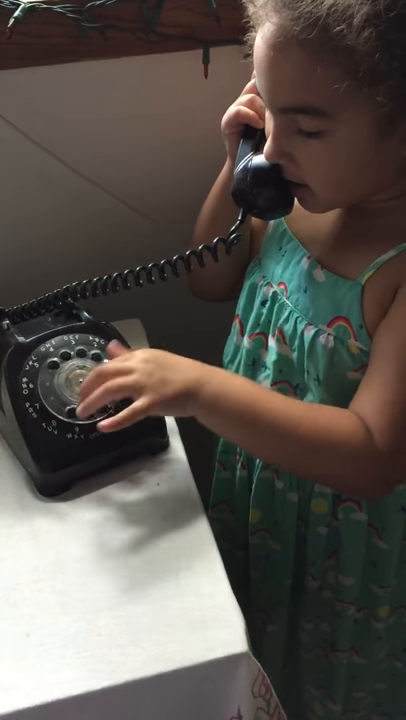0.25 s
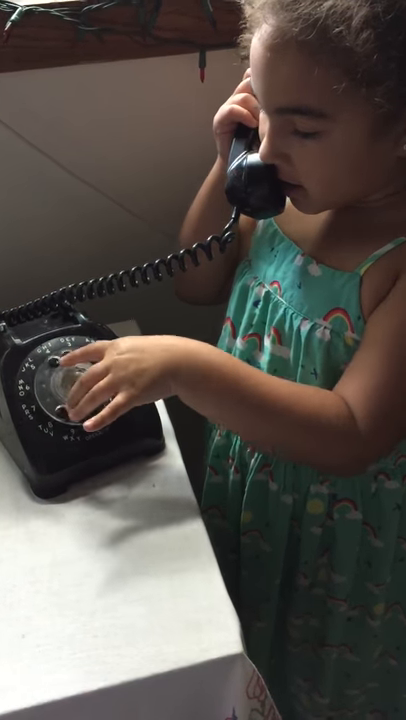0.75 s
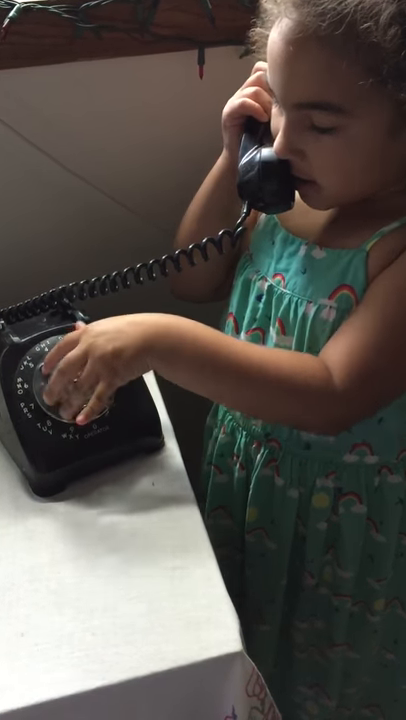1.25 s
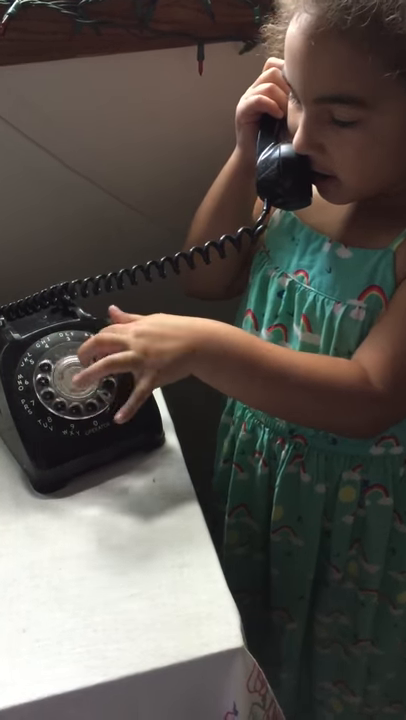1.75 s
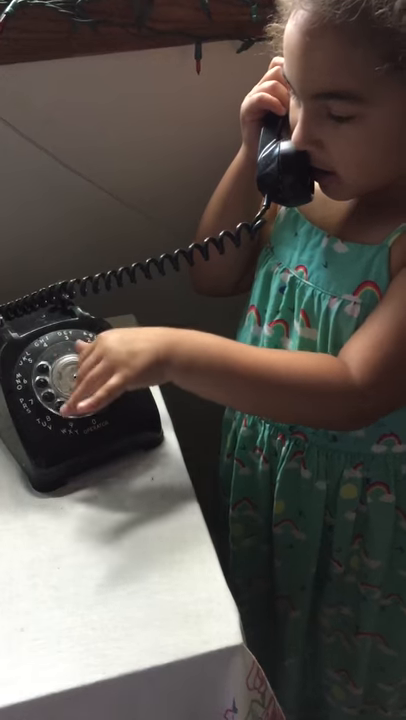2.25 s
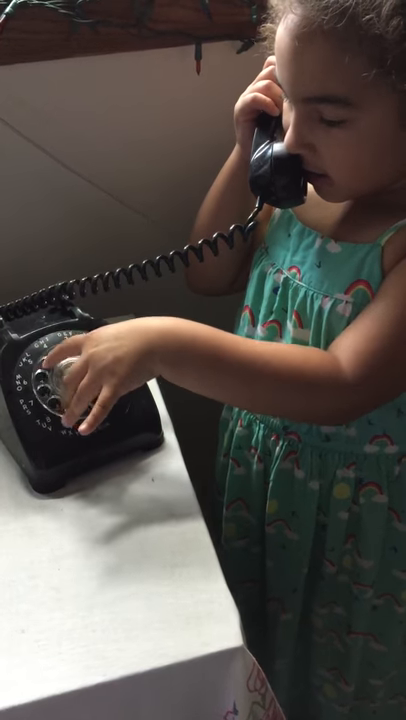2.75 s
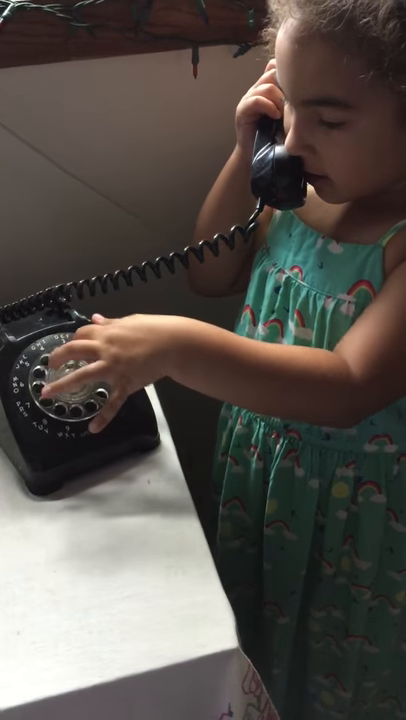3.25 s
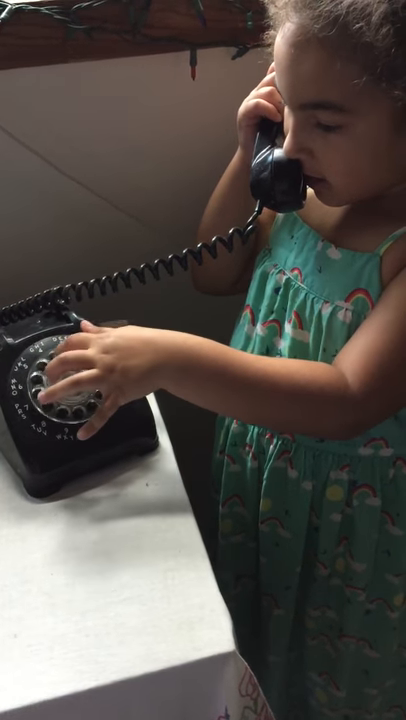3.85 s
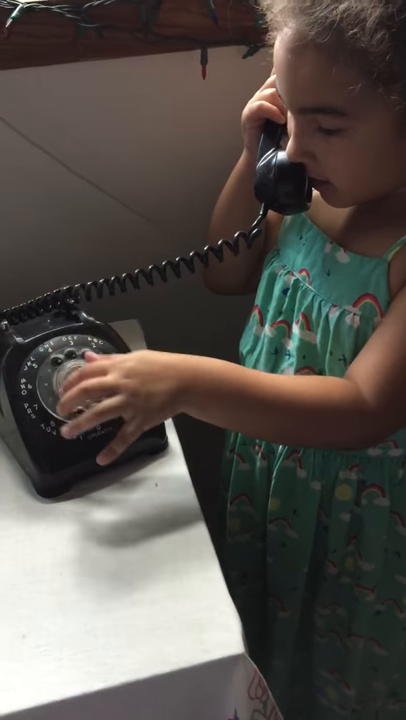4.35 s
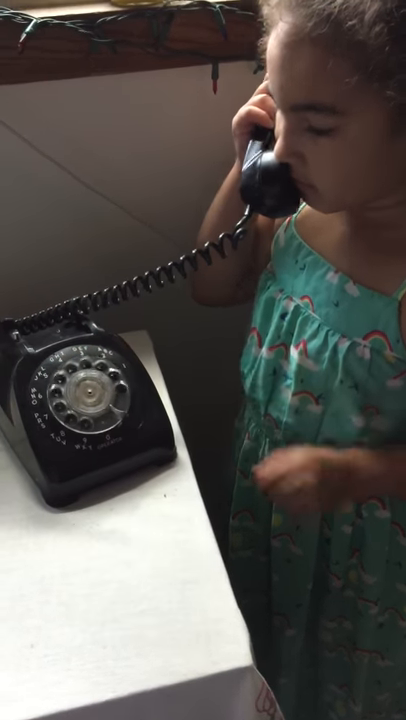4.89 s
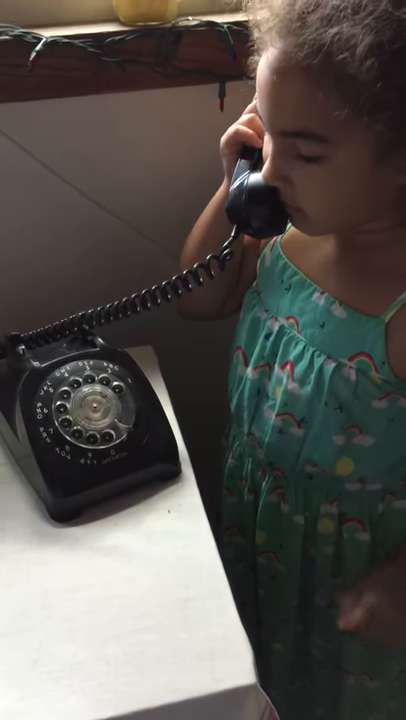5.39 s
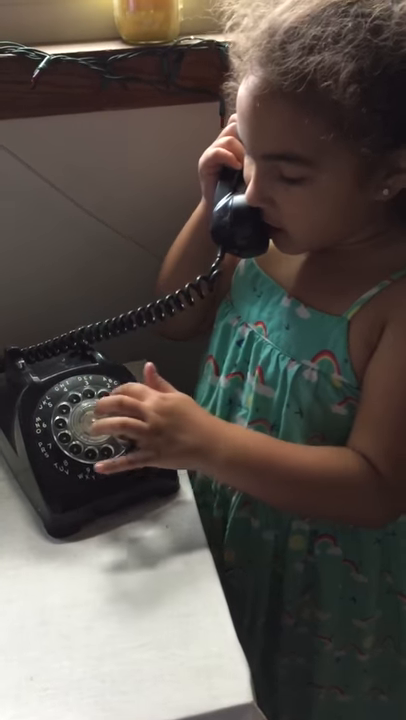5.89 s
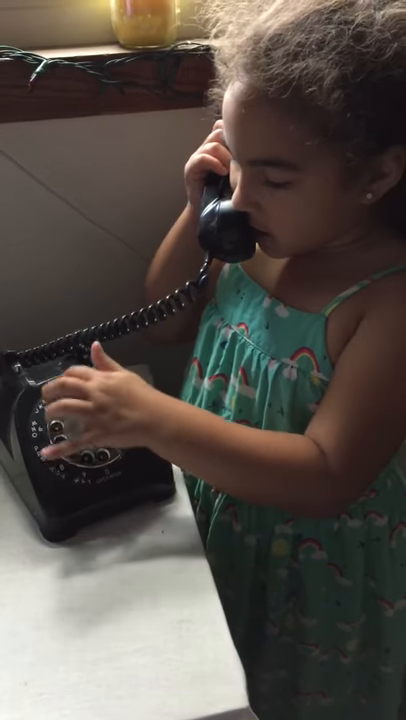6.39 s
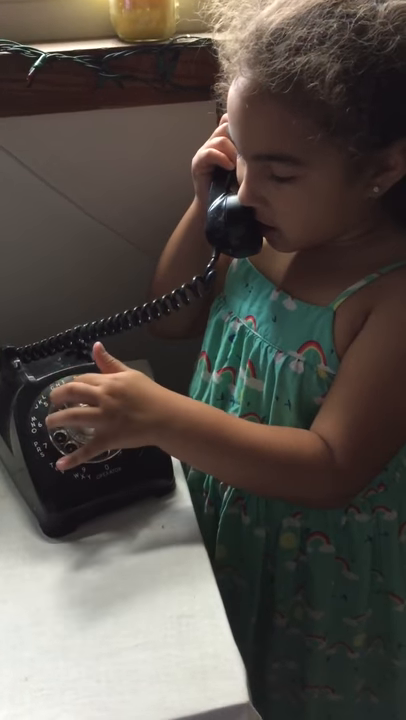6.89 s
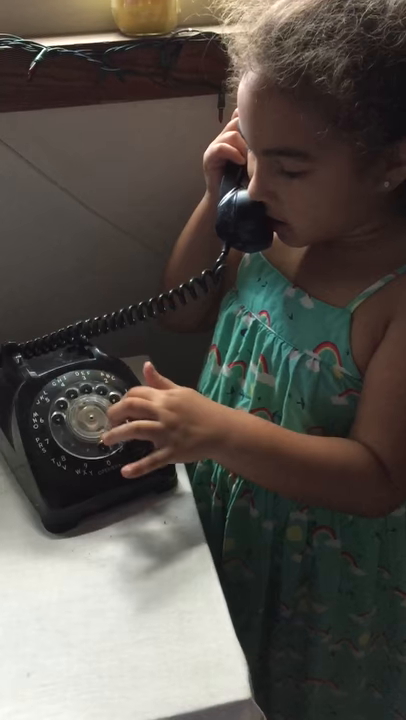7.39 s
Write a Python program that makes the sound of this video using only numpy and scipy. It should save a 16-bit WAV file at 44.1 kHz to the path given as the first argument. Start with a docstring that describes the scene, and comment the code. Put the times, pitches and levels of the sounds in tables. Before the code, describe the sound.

A rotary telephone dial is handled close to a mono microphone in a small quiet room, over faint steady air noise, a lumpy low drone and the soft stir of an arm. At 0.4 to 0.5 s a fingertip bump and crisp double click; faint taps and ticks follow to 1.6 s. At 2.25 s comes the loudest hard, bright clack, trailed by smaller clicks until about 2.5 s. Near quiet until a hollow, dull knock at 3.4 s with a tiny brief squeak. Clicks at 3.93 and 3.96 s lead into the release: from 4.03 to 5.18 s the wheel runs back with a rasping, gritty gear whirr, recurring scrapes and uneven surges over a low buzz near 120 Hz, sagging slightly in pitch. It stops abruptly with a bright clack and short room tail. Then quiet, with barely audible touches at 5.9, 6.6 and 7.2 s.

```python
"""A rotary telephone under a child's hands, close to a mono microphone in a small quiet room.
Fingertips bump the finger wheel and hard clicks ring the case: shaped bursts of noise that die away.
Let go once, the wheel runs back with a rasping whirr, gear-tooth impacts through resonances, over
the governor's hum, a stack of sines, and clacks against its rest. A fingertip squeaks briefly.
Behind it lie the noise of the air, a low drone and the soft stir of an arm."""
import sys
import numpy as np
from scipy import signal
from scipy.fft import rfft, irfft
from scipy.io import wavfile
from scipy.ndimage import uniform_filter1d

SR = 44100
rng = np.random.default_rng(int(sys.argv[2]) if len(sys.argv) > 2 else 0)


def transcribe(u):
    """Save the signal u as a 16-bit wav file named by the first command-line argument.

    u: samples, shape (n,) or (channels, n), limited to [-1, 1]; the rate is SR.
    q: integer samples, one column per channel.
    """
    v = np.clip(np.atleast_2d(u).T, -1, 1)
    q = np.round(v * 32767).astype(np.int16)
    wavfile.write(sys.argv[1], SR, q)


N = 336483

RELEASE_S, REST_S = 4.03, 5.176  # the wheel runs free between these times


def amp(db):
    """Decibels to gain."""
    return 10 ** (np.asarray(db) / 20)


def evened(x):
    """Scales to rms 1."""
    return x / np.sqrt(np.mean(x ** 2) + 1e-20)


def read(points, hz):
    """Reads a table on a log-frequency axis."""
    f, value = np.transpose(points)
    return np.interp(np.log(hz + 1), np.log(f + 1), value)


def add(mix, s, sound):
    """Mixes a sound in at time s."""
    part = mix[round(s * SR):][:len(sound)]
    part += sound[:len(part)]


def bins(size):
    """Frequencies of a spectrum."""
    return np.fft.rfftfreq(size, 1 / SR)


def peaks(modes, hz, boost_db):
    """Gain of resonances standing above a flat response."""
    power = 1
    for f, width, db in modes:
        power = power + amp(db + boost_db) ** 2 / (1 + (2 * (hz - f) / width) ** 2)
    return np.sqrt(power)


def lift(hz, centre_hz, db, sharpness=7):
    """Gain of one broad resonance."""
    return 1 + (amp(db) - 1) / (1 + (sharpness * (hz - centre_hz) * 2 / centre_hz) ** 2)


def causal(gain):
    """Impulse response of minimum phase for a gain curve."""
    log_gain = np.log(np.maximum(gain, 1e-5))
    circle = np.concatenate([log_gain, log_gain[-2:0:-1]])
    return irfft(np.exp(np.conj(signal.hilbert(circle)))[:len(gain)])


def wander(rate_hz):
    """Slow chance of rms 1."""
    return evened(irfft(rfft(rng.standard_normal(N)) * np.exp(-(bins(N) / rate_hz) ** 2), N))


def dying_noise(t60, size, stretch=1, rise_cycles=0, count=16):
    """A flat burst of energy 1; each band swells over a few of its cycles and dies at its own speed."""
    t, hz, centres = np.arange(size) / SR, bins(size), np.geomspace(150, 16000, count)
    white, out = rfft(rng.standard_normal(size)), np.zeros(size)
    for centre, pick in zip(centres, np.eye(count)):
        share = read(np.c_[centres, pick], hz)
        swell = 1 - np.exp(-t * centre / (abs(rise_cycles) + 1e-6))
        decay = np.exp(-np.log(1000) * t / (read(t60, centre) * stretch))
        band = irfft(white * share, size) * swell * decay
        out += evened(band) * np.sqrt(share.mean())
    return evened(out) / np.sqrt(size)


def air():
    """Steady room noise and a lumpy drone, with the soft, uneven stir of a moving arm."""
    # Colour of the room noise. Each row: frequency in Hz, relative level in dB
    air_colour = [(25, -32.5), (40, -16.5), (55, -6.5), (72, -11), (150, -6), (260, -11), (600, -14),
                  (800, -16), (2200, -17), (3200, -27.5), (5000, -32), (9000, -37), (10500, -39.5),
                  (16000, -42.5)]
    # Low drone of the room. Each row: centre in Hz, half-width in Hz, level in dB before it wavers
    rumble = [(58, 8, -69.5), (93, 7, -61.5), (119, 6, -66)]
    # Hand and arm shifting softly. Each row: time in seconds, level in dB before stir_gain_db
    handling = [(0, -63), (1.5, -63), (3.6, -65.5), (7.6, -66)]
    stir_colour = [(90, -28.0), (220, 2), (480, 0.5), (900, -15), (3000, -33.5)]  # Hz, relative dB
    air_db, stir_gain_db = -61, -3
    stir_wander_db, lumpy_db = 3.5, 3.0  # rms of the slow level changes
    hz = bins(N)

    def noise(gain):
        """Steady noise of rms 1 with a given colour."""
        return evened(irfft(rfft(rng.standard_normal(N)) * gain, N))

    drone = np.zeros(N)
    for f, half_width, db in rumble:
        drone += amp(db + lumpy_db * wander(7.2)) * noise(1 / (1 + ((hz - f) / half_width) ** 2))
    motion_db = np.interp(np.arange(N) / SR, *np.transpose(handling)) + stir_wander_db * wander(18)
    stir = amp(motion_db + stir_gain_db) * noise(amp(read(stir_colour, hz)))
    return amp(air_db) * noise(amp(read(air_colour, hz))) + drone + stir


def room(x, onset_s=.012, size=32768):
    """A few near reflections and the short tail of a small room."""
    # Decay of the tail. Each row: frequency in Hz, time to fall 60 dB in seconds
    tail_t60 = [(150, 0.33), (500, 0.4), (2000, 0.39), (4500, 0.37), (9000, 0.34), (15000, .3)]
    # Strength of the tail. Each row: frequency in Hz, level in dB
    tail_level = [(150, -7.5), (500, -10), (2000, -10), (4500, -17), (9000, -16.5), (11500, -18.5),
                  (16000, -21)]
    # Reflections off table and walls. Each row: delay in seconds, level in dB
    echoes = [(.0095, -20.5), (.017, -20), (.03, -19.5), (.041, -23.5)]
    onset = 1 - np.exp(-(np.arange(size) / SR / onset_s) ** 2)
    tail = dying_noise(tail_t60, size) * onset
    response = signal.fftconvolve(tail, causal(amp(read(tail_level, bins(1024)))))
    for delay, db in echoes:
        add(response, delay, amp(db) * np.array([.25, .5, .25]))  # slightly dulled
    return x + signal.fftconvolve(x, response)[:N]


def squeak():
    """A fingertip slips on the wheel: a short, unsteady stick-slip tone."""
    # The slip: start in seconds, end in seconds, mean pitch in Hz
    start, end, hz = (3.445, 3.495, 1809)
    squeak_db = -62
    out, swell = np.zeros(N), np.hanning(round((end - start) * SR))
    turns = np.cumsum(hz * (1 + .015 * wander(200)[:len(swell)])) / SR
    add(out, start, amp(squeak_db) * 2 * swell * np.sin(2 * np.pi * turns))
    return out


def rub_db(t):
    """How far the rub of the gears lies above its average."""
    # How hard the gear train rubs as it runs back; only departures from the mean count.
    # Each row: time in seconds, rub in dB
    run = [(4.04, -44.5), (4.052, -43.5), (4.414, -39.5), (4.448, -45.5), (4.56, -40), (4.582, -45.5),
           (4.616, -38), (4.632, -45), (5.16, -47)]
    s, db = np.transpose(run)
    return np.interp(t, s, db - db.mean())


def governor_speed():
    """Turns per second, and full speed: a quick spin-up, then a sag as the spring unwinds, until rest."""
    full_hz, sag_hz_per_s, spin_up_s = 120.4, 5, .025
    age = np.maximum(np.arange(N) / SR - RELEASE_S, 0)
    speed_hz = (full_hz - sag_hz_per_s * age) * (1 - np.exp(-age / spin_up_s))
    return speed_hz * (np.arange(N) / SR < REST_S), full_hz


def governor_turns():
    """Turns made by the governor, whose speed wavers a little."""
    speed_hz, _ = governor_speed()
    return np.cumsum(speed_hz * (1 + 0.014 * wander(26))) / SR


def hum(turns):
    """The slightly unbalanced governor shakes the case at multiples of its speed."""
    # Each row: multiple of the turning speed, relative level in dB before it wavers
    harmonics = [(1, -1), (2, -1.5), (3, -3), (4, -2), (5, -4.5)]
    hum_db = -63  # at average rub and full speed
    speed_hz, full_hz = governor_speed()
    level = amp(hum_db + rub_db(np.arange(N) / SR)) * (speed_hz / full_hz) ** 2
    tones = np.zeros(N)
    for multiple, db in harmonics:
        tone = np.sin(2 * np.pi * (round(multiple) * turns + rng.random()))
        tones += amp(db + 2.4 * wander(18)) * tone
    return level * np.sqrt(2) * tones


def teeth(turns, per_s=1700, spread_db=1.0, rub=0.71, throb=0.054):
    """Tiny impacts of gear teeth over a steady rub, pressed harder once a governor turn."""
    strength = amp(spread_db * np.minimum(rng.exponential(1, N), 4))
    ticks = (rng.random(N) < per_s / SR) * rng.choice([-1, 1], N) * strength
    grain = evened(ticks) + rub * rng.standard_normal(N)
    return evened(grain * (1 + throb * np.cos(2 * np.pi * turns)))


def shifting(x, patchy_db=2.0):
    """As the points of contact move, patches of the spectrum swell and fade."""
    z = signal.stft(x, nperseg=512, noverlap=384)[2]
    patches = uniform_filter1d(rng.standard_normal(z.shape), size=9, axis=0)
    patches = uniform_filter1d(patches, size=12, axis=1)
    return signal.istft(z * amp(patchy_db * evened(patches)), nperseg=512, noverlap=384)[1][:N]


def scrapes(turns, frame, hz, size=4096):
    """Brief drags on the gear train: the same tight spots return every turn, each with its own colour."""
    # Each row: place in the turn from 0 to 1, level in dB before gain_db,
    # resonance in Hz, treble in dB
    tight_spots = [(.22, -34.5, 4320, 5), (.38, -35, 2750, 2.5), (.745, -35.5, 2450, -5),
                   (.98, -33, 2440, 4)]
    gear_turn_s = .26  # one turn of the gear that carries the pulse cam
    rise_s, gain_db, follow = 0.0046, -7, 0.95  # follow in dB per dB of rub
    lift_db, top_db = 6, 4  # top: above 10 kHz, relative to the treble
    out, grain, age = np.zeros(N), teeth(turns), np.arange(size) / SR / rise_s
    for place, db, centre_hz, treble_db in tight_spots:
        slope = [(500, -8.0), (3000, -6), (10000, treble_db), (14000, treble_db + top_db)]
        tone = amp(read(slope, hz)) * lift(hz, centre_hz, lift_db)
        colour = causal(evened(frame * tone))
        for s in np.arange(RELEASE_S + place * gear_turn_s, REST_S - 2 * rise_s, gear_turn_s):
            drag = grain[round(s * SR):][:size] * age * np.exp(1 - age)
            level = amp(db + gain_db + follow * rub_db(s))
            add(out, s, level * signal.fftconvolve(drag, colour))
    return out


def whirr(turns, size=4096):
    """The spring drives the gears; they chatter, ring a plate and shake the case; the governor hisses."""
    # Colour of the gears. Each row: frequency in Hz, relative level in dB
    gear_colour = [(150, -11), (240, -18), (285, -17), (360, 1.5), (570, 0.5), (760, -3.5), (1000, -8),
                   (1230, 4), (1400, 0.5), (2200, 1.5), (4400, 1.5), (4780, -8), (5250, 1.5), (7200, -8.5),
                   (11300, -8.5), (12400, -15.5), (16000, -23)]
    # Resonances of the gear frame. Each row: centre in Hz, width in Hz, height in dB before a 6 dB boost
    frame_modes = [(1902, 80, 3), (2400, 38, -4), (2760, 29, 1.5), (3010, 110, -2), (4330, 48, 2.5),
                   (5080, 220, -2.5), (5450, 34, -11), (5830, 68, 1), (7500, 90, -4), (8260, 240, -5.5),
                   (9570, 150, 0), (9840, 180, -1), (10400, 47, -2), (10970, 150, -1.5)]
    chatter_db, plate_db, hiss_db, shake_db = -44.5, -53, -50, -65.5  # at average rub
    plate_follow, hiss_follow = 0.19, 1.34  # dB per dB of rub
    creep_db, split_hz = -60, 7200  # chatter lies below the split, hiss above
    plate_hz, plate_width_hz, shake_hz, shake_width_hz = 2650, 520, 300, 260
    t, hz = np.arange(N) / SR, bins(size)
    frame = amp(read(gear_colour, hz)) * peaks(frame_modes, hz, boost_db=6)
    low = 1 / (1 + (hz / split_hz) ** 8)
    plate = 1 / (1 + (2 * (hz - plate_hz) / plate_width_hz) ** 2)
    shake = 1 / (1 + (2 * (hz - shake_hz) / shake_width_hz) ** 4)
    # the wheel first creeps under the lifting finger, then runs free
    creep = amp(creep_db) * ((t > 3.96) & (t < RELEASE_S))
    running = np.clip((t - RELEASE_S) / 0.0052, 0, 1) * (t < REST_S) * amp(1.2 * wander(67))

    def force(db, follow=1):
        """Drive of one layer, following the rub of the gears."""
        return running * amp(db + follow * rub_db(t))

    def ring(drive, gain):
        """Gear teeth at a given drive, heard through a resonant body."""
        return signal.oaconvolve(teeth(turns) * drive, causal(evened(gain)))[:N]

    out = ring(creep + force(chatter_db), frame * np.sqrt(low))
    out += ring(force(plate_db, plate_follow), frame * plate)
    out += ring(force(hiss_db, hiss_follow), frame * np.sqrt(1 - low))
    out += ring(force(shake_db), shake)
    return shifting(out) + scrapes(turns, frame, hz)


def blow(tone_db, ring, thud_hz, centre_hz, lift_db, size=8192):
    """One blow on wheel and case: a dying burst of noise with its own colour and length."""
    # Where thud, knock, level and treble act, in Hz
    tone_hz = [430, 1150, 3500, 12000]
    # Colour of the struck wheel and case. Each row: frequency in Hz, relative level in dB
    clack_colour = [(60, -45), (130, -17.5), (240, -11), (330, -13), (490, -11), (780, -15), (1000, -14.5),
                    (1300, -7.5), (1800, -8.5), (3000, -1.5), (4200, -1.5), (6300, -7), (8800, -6.5),
                    (11200, -15.5), (16000, -18)]
    # Decay before the ring factor. Each row: frequency in Hz, time to fall 60 dB in seconds
    clack_t60 = [(200, 0.043), (500, 0.047), (1200, 0.059), (3500, 0.041), (8000, 0.029), (15000, .018)]
    # Resonances of the case. Each row: centre in Hz, width in Hz, height in dB before a 5 dB boost
    case_modes = [(246, 19, -1), (1670, 127, -4), (1890, 90, -1), (2270, 130, -5.5), (2710, 41, -5.5),
                  (3360, 90, -5.5), (3710, 72, -2), (4000, 90, -5), (4393, 110, -4.5), (5460, 90, -6.5),
                  (5560, 200, -9)]
    blow_samples = .011 * SR  # nominal length that sets the level
    hz = bins(size)
    body = evened(amp(read(clack_colour, hz)) * peaks(case_modes, hz, boost_db=5))
    tone = amp(read(np.c_[tone_hz, tone_db], hz)) * lift(hz, centre_hz, lift_db)
    tone *= lift(hz, thud_hz, 12, sharpness=3.31)  # the whole telephone rocks on the table
    burst = dying_noise(clack_t60, size, max(ring, .2), rise_cycles=2.2, count=24)
    return np.sqrt(blow_samples) * signal.fftconvolve(burst, causal(body * tone))


def bumps():
    """Soft fingertips on the wheel: flesh passes little treble, and the case knocks hollow."""
    # Each row: time in seconds, thud in dB, knock in dB relative to the thud, thud in Hz, knock in Hz
    touches = [(.401, -35, -27, 520, 1300), (.739, -42, -12, 460, 1300), (.936, -43, -14, 415, 1300),
               (1.177, -39, -28, 432, 1300), (1.464, -38.5, -0.5, 484, 1320), (3.386, -21, -2, 530, 1073),
               (5.94, -39, -28.5, 250, 1300), (6.609, -40.5, -25, 480, 1300)]
    out, average_db = np.zeros(N), np.mean(touches, axis=0)[1]
    for s, db, knock_db, thud_hz, knock_hz in touches:
        above_db = db - average_db
        top_db = -34.5 + .25 * knock_db + 0.68 * above_db  # a stronger bump is brighter
        ring = 0.67 + 0.02 * knock_db  # less knock, shorter ring
        lift_db = 13 - 0.16 * above_db  # the hollow resonance stands out more under a light bump
        tone_db = [0, knock_db, top_db, top_db - 1]  # flesh damps the highest treble further
        add(out, s, amp(db) * blow(tone_db, ring, thud_hz, knock_hz, lift_db))
    return out


def clicks():
    """Hard, bright clicks: the wheel strikes its stop, bearing and rest, and the case rings."""
    # Where a blow lands sets its thud and the resonance that stands out.
    # Each row: time in seconds, level in dB, thud in dB, treble in dB, ring length factor,
    # thud in Hz, resonance in Hz, lift of that resonance in dB
    strikes = [(0.4467, -34, 7.5, 2.5, .8, 460, 6150, 6.5), (.450, -33, 8, -16, 0.92, 442, 1580, 9),
               (.487, -48, -9, -1, 1.5, 450, 2800, 4), (.497, -46.5, 13, 1.5, 0.88, 440, 8400, 11),
               (.724, -59, 0, -10, 2.6, 480, 4000, 2), (.903, -51, 8, 12, .62, 467, 3430, 7),
               (1.583, -62.5, 12, 14.5, 1.1, 480, 4040, 10.5), (2.233, -51.5, 16, 8, 1.3, 497, 6040, 10),
               (2.246, -17, 1, 4.5, 0.99, 563, 1820, 3), (2.326, -41, -9, -1, 1.3, 500, 8500, 6.5),
               (2.341, -42, -6, -3, 1.2, 500, 2960, 6), (2.362, -50, -6, 5, 0.64, 500, 8500, 3),
               (2.368, -42, 6.5, 7.5, 0.54, 450, 9000, 8.5), (2.408, -42.5, -3, -0.5, 0.99, 450, 3300, 6),
               (2.461, -54, 8, 7, 1.1, 485, 2740, 8.5), (2.537, -75, -0.5, 21, 4.3, 479, 3480, 16),
               (3.934, -41.5, -1, -1.5, 1.1, 484, 2180, 2), (3.958, -36.5, 0.5, -5, 0.93, 420, 3370, 5.5),
               (5.177, -37.5, 7, 11.5, 0.82, 472, 1210, 7), (6.529, -76, 12, -4.5, 1.5, 480, 3400, 19),
               (7.183, -68, -2, 1, 1.1, 480, 4400, 0)]
    lead_s, lead_db, lead_below_db = .0055, -56.5, 10
    out = np.zeros(N)
    for s, db, thud_db, treble_db, ring, thud_hz, centre_hz, lift_db in strikes:
        knock_db = 4 + 0.21 * thud_db  # a heavier thud brings more hollow knock from the case
        click = blow([thud_db, knock_db, 0, treble_db], ring, thud_hz, centre_hz, lift_db)
        # a faint copy of the click sounds 5.5 ms ahead of it, softening its attack, always below the click
        add(out, s - lead_s, amp(min(lead_db, db - lead_below_db)) * click)
        add(out, s, amp(db) * click)
    return out


def scene():
    """The telephone in its room, the same in both channels."""
    turns = governor_turns()
    telephone = squeak() + hum(turns) + whirr(turns) + bumps() + clicks()
    mono = room(telephone) + air()
    return np.array([mono, mono])


def record(dry):
    """The recorder's band limit, at 16 kHz."""
    band_limit = signal.firwin(255, 16000, window=("kaiser", 8), fs=SR)
    return signal.oaconvolve(dry, band_limit[None], "same")


dry = scene()
out = record(dry)
transcribe(out)
```